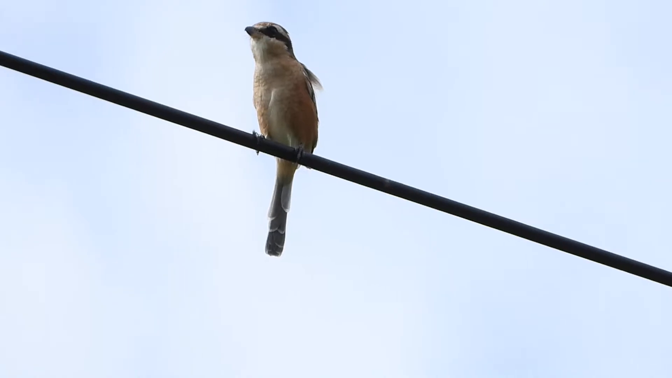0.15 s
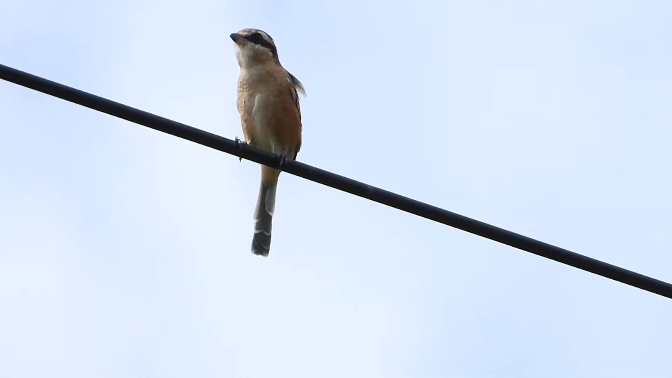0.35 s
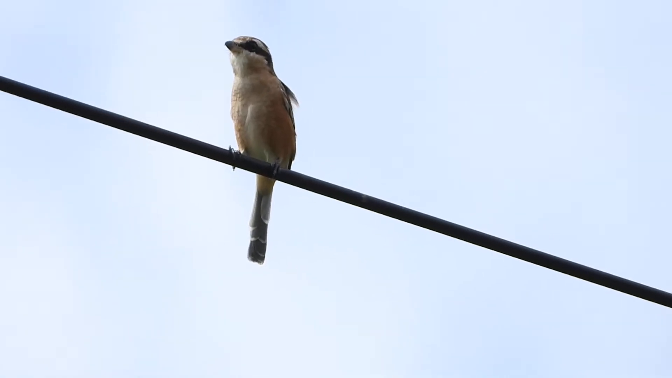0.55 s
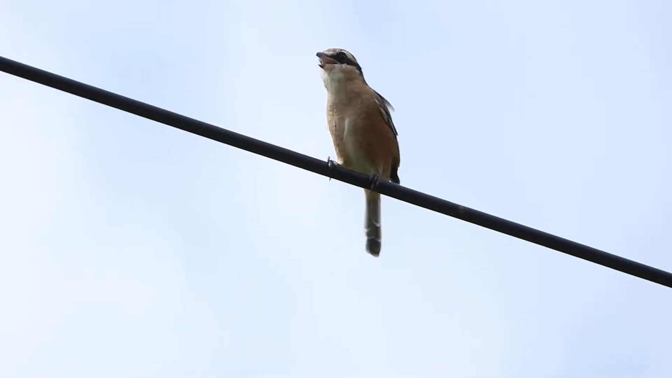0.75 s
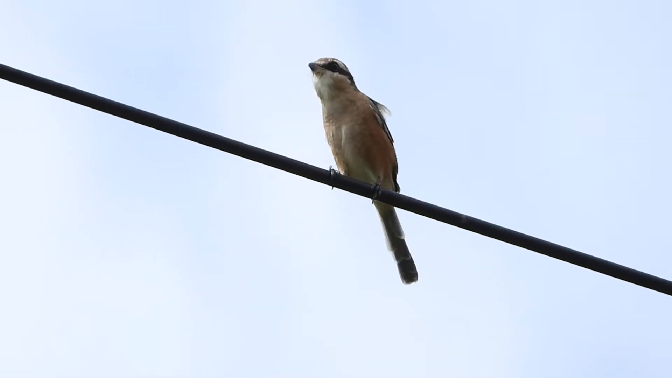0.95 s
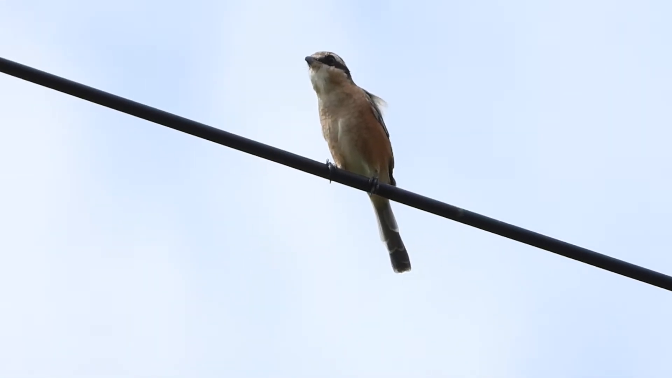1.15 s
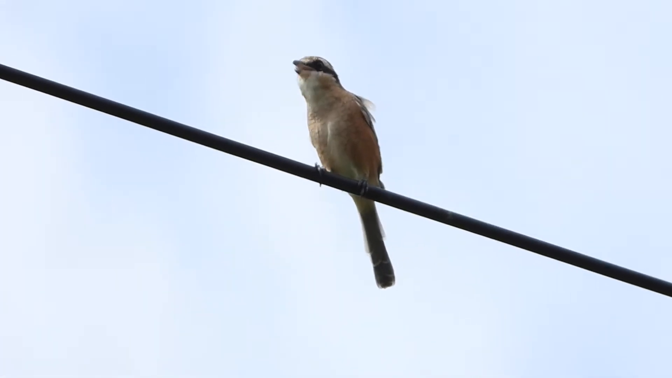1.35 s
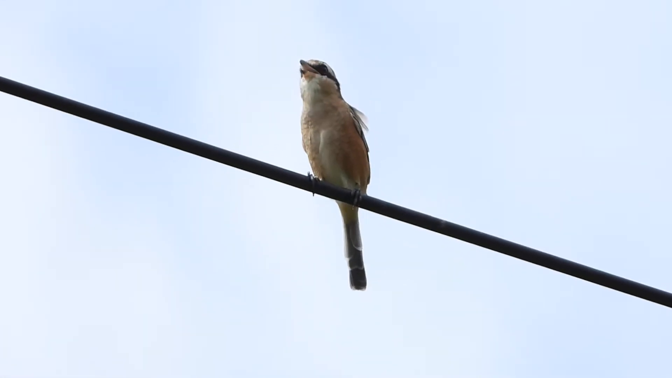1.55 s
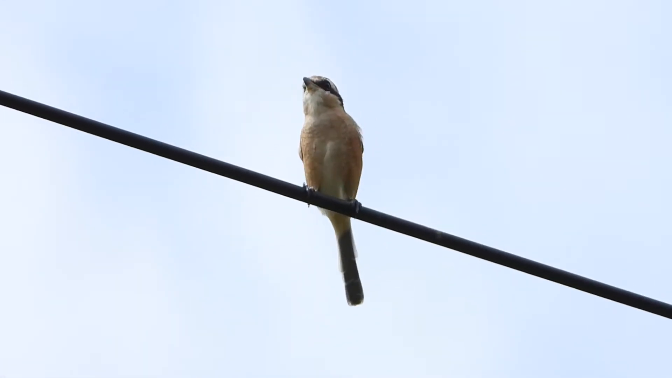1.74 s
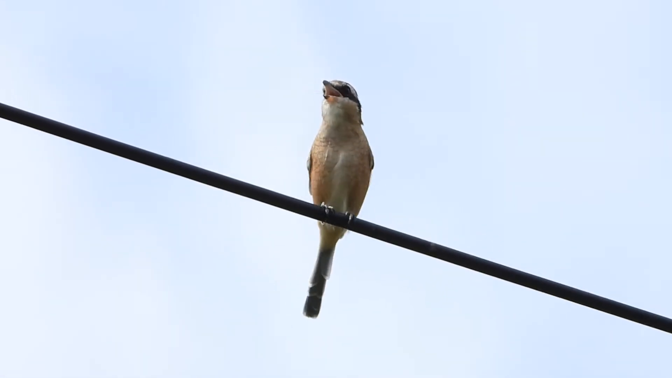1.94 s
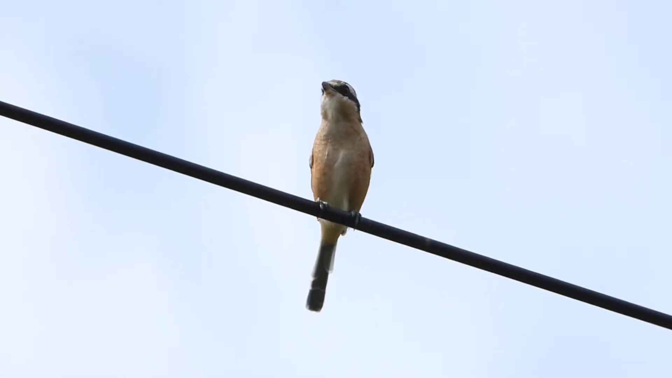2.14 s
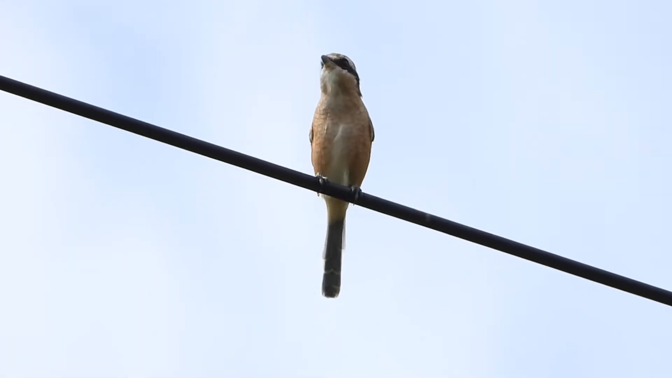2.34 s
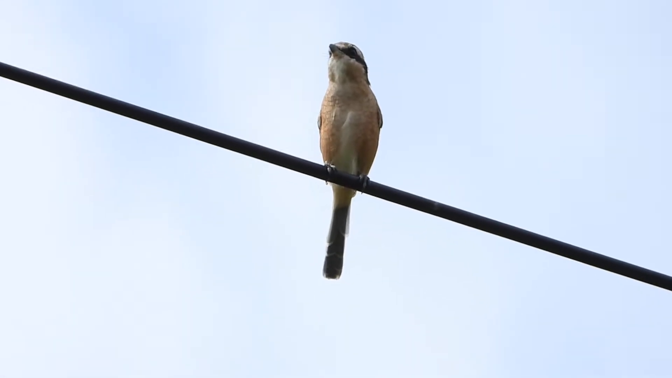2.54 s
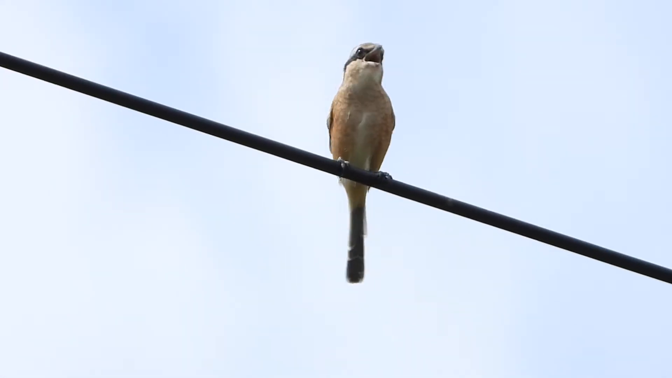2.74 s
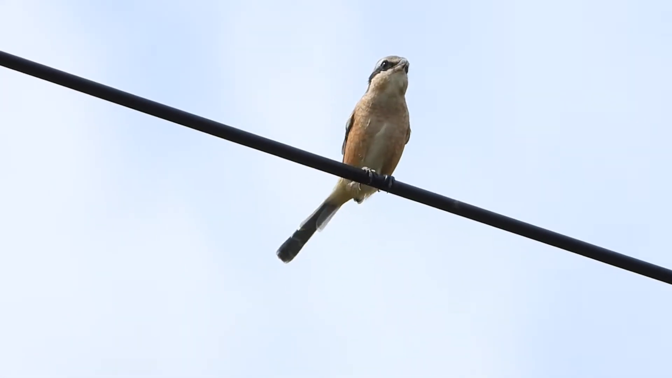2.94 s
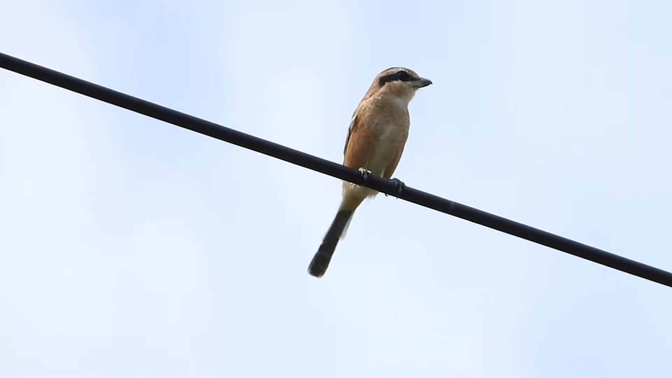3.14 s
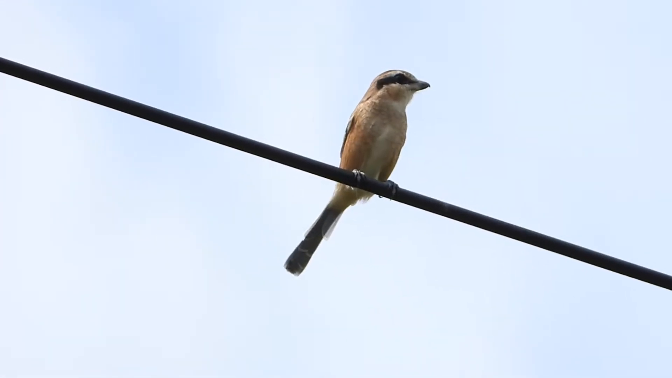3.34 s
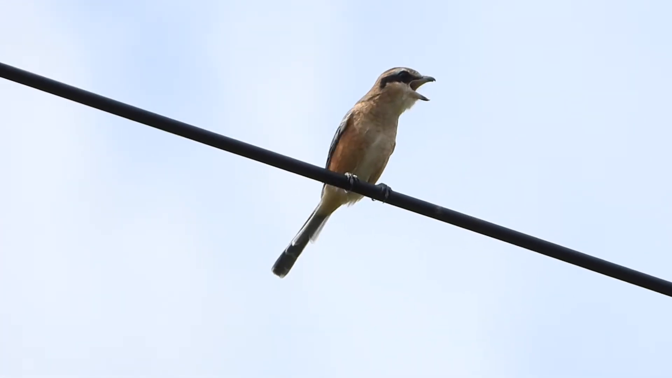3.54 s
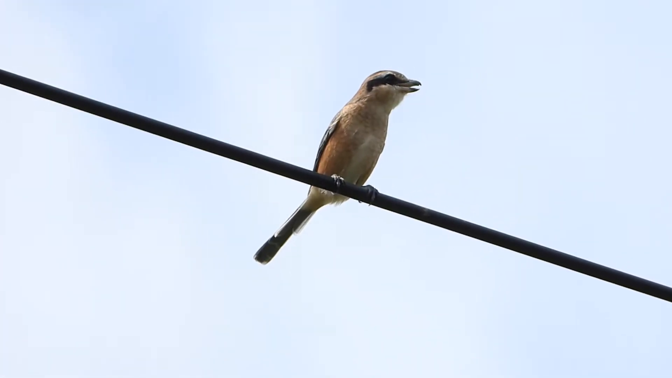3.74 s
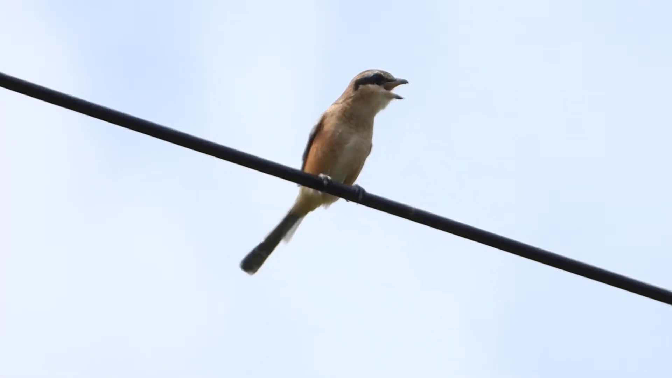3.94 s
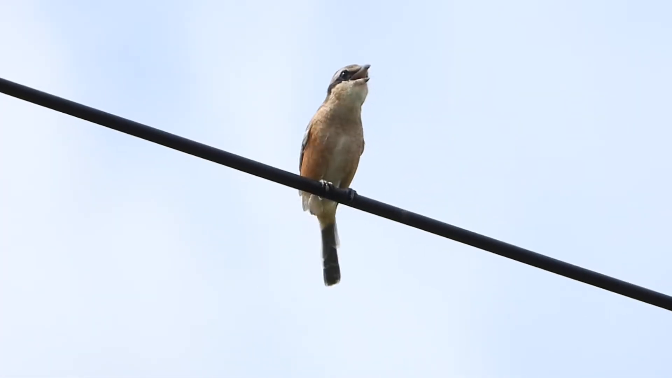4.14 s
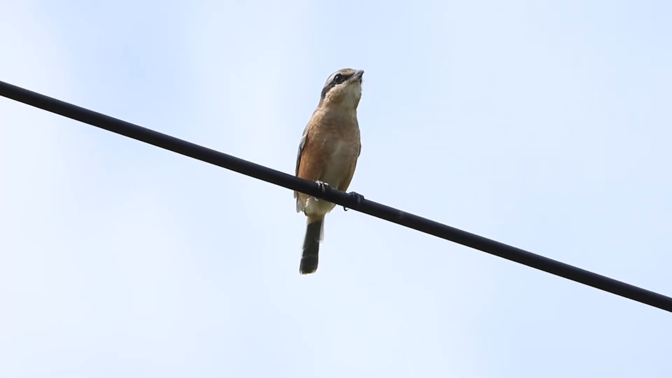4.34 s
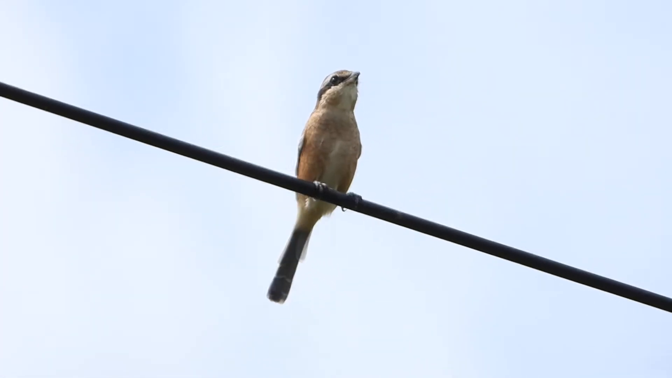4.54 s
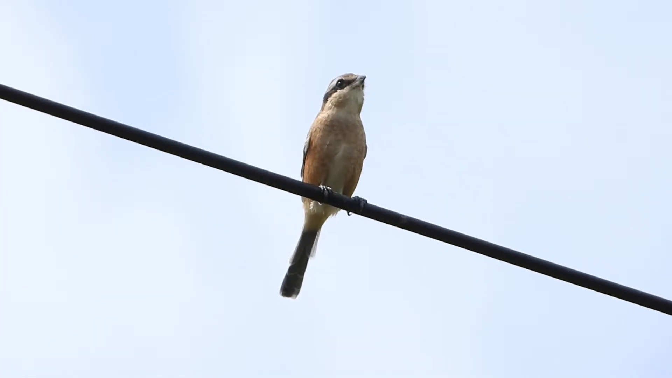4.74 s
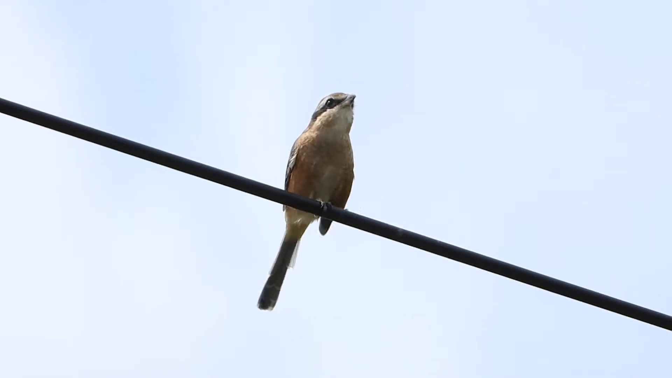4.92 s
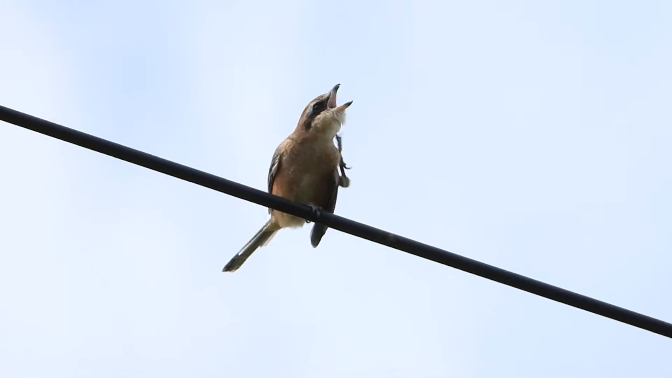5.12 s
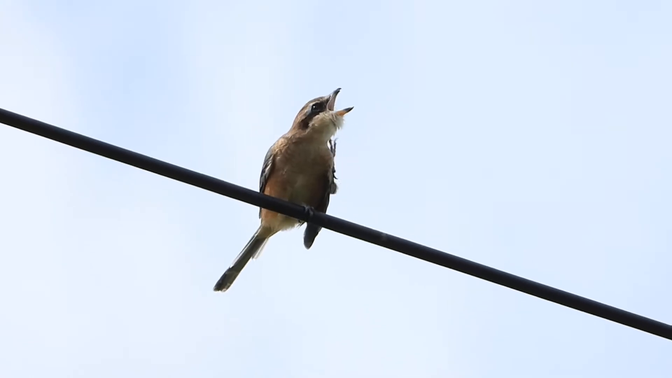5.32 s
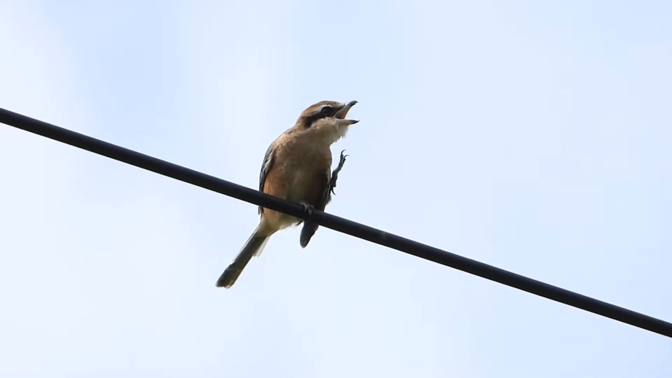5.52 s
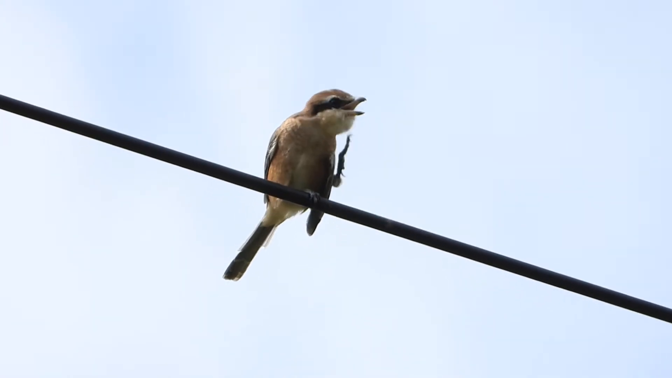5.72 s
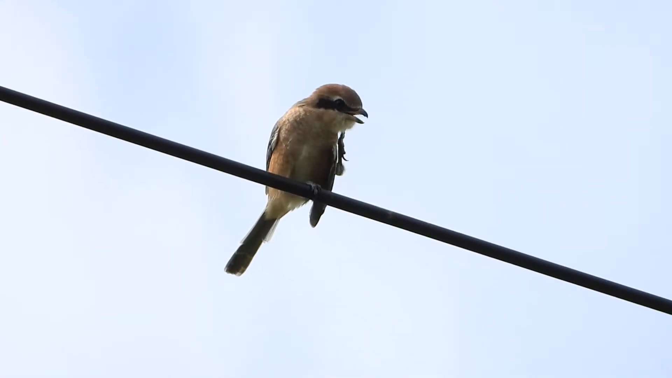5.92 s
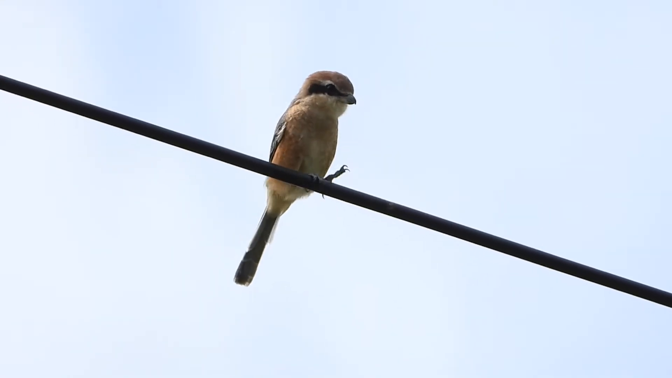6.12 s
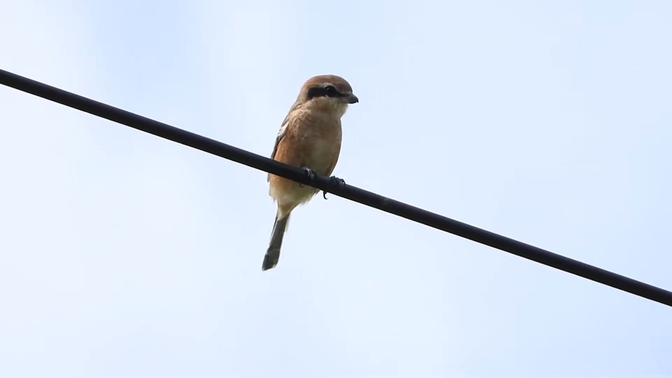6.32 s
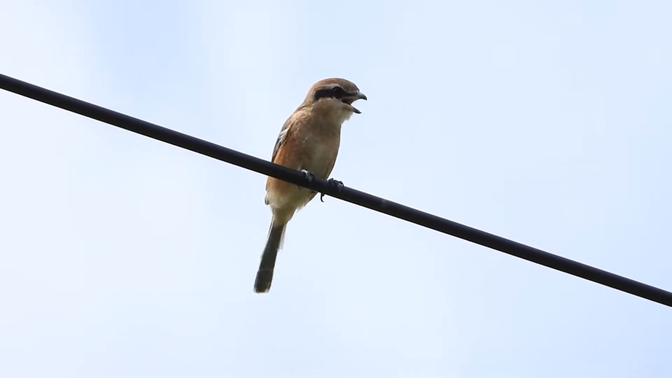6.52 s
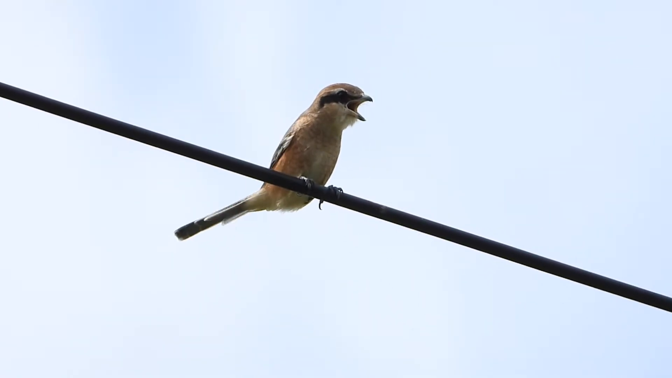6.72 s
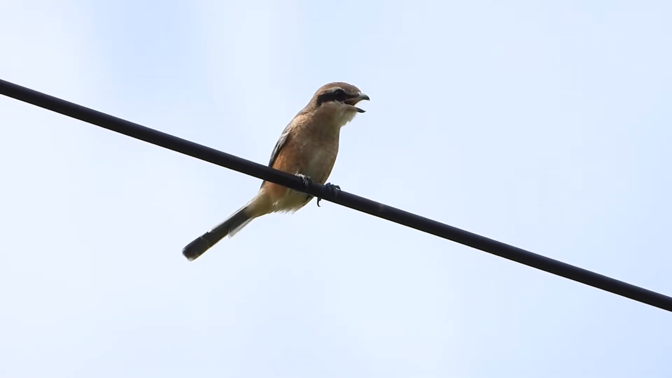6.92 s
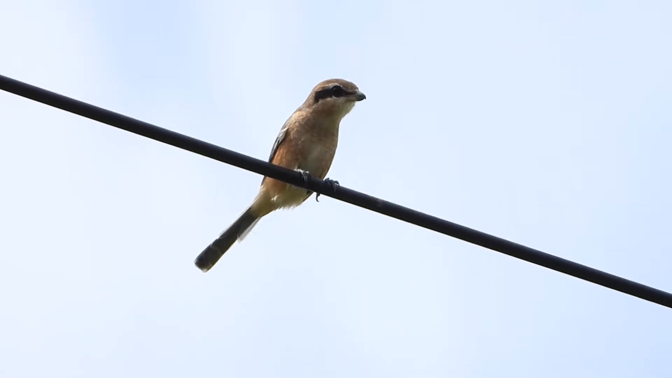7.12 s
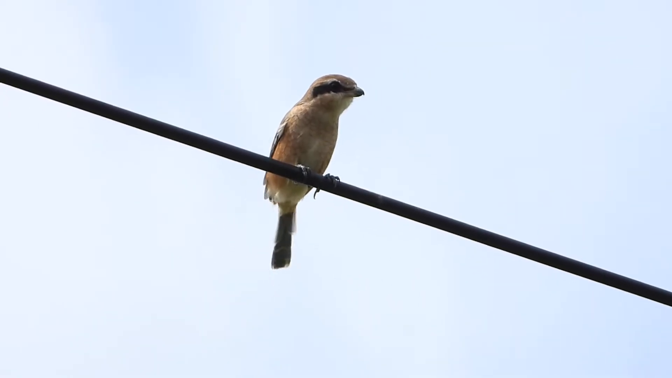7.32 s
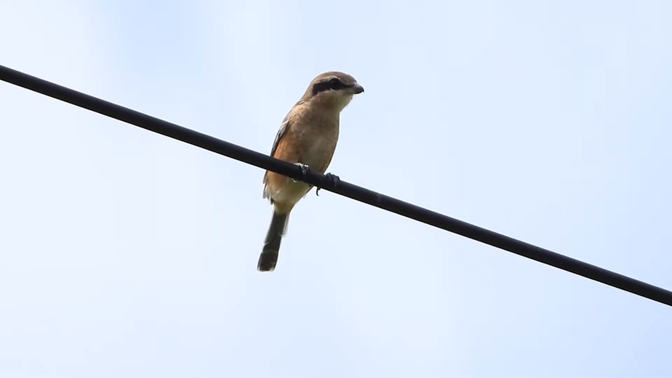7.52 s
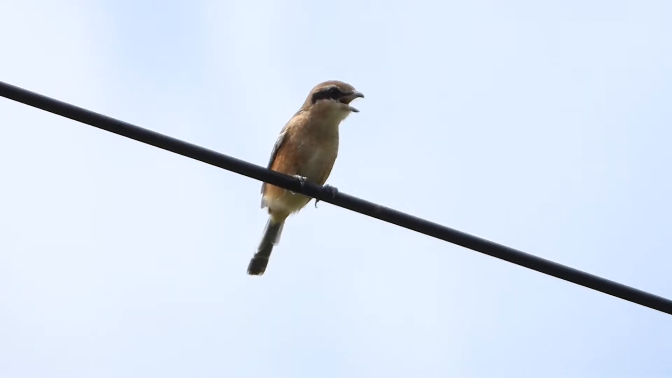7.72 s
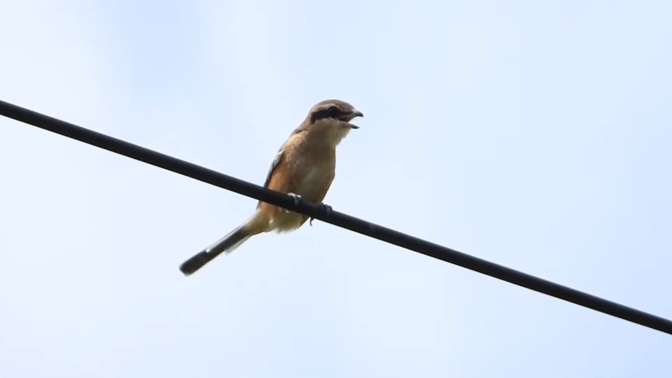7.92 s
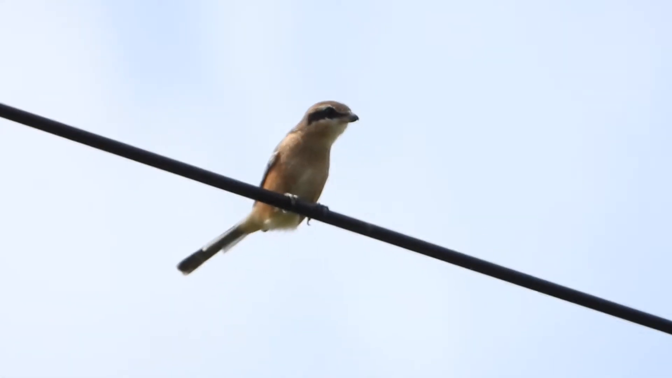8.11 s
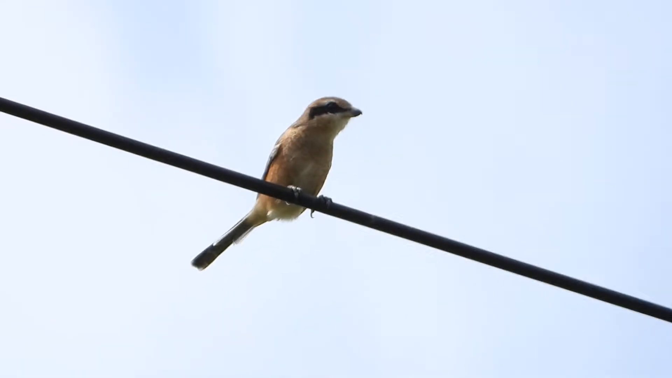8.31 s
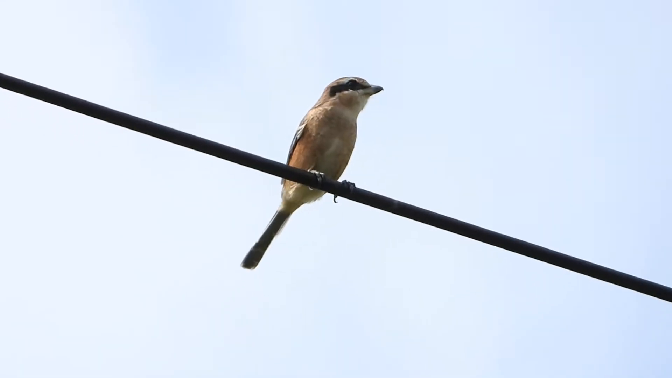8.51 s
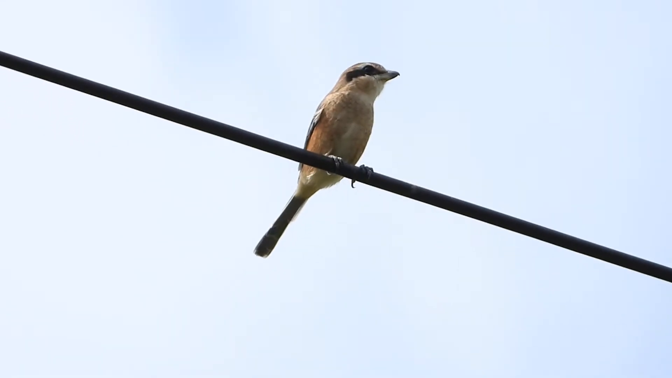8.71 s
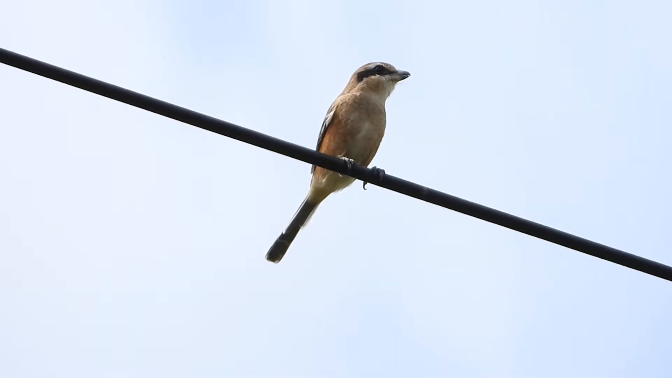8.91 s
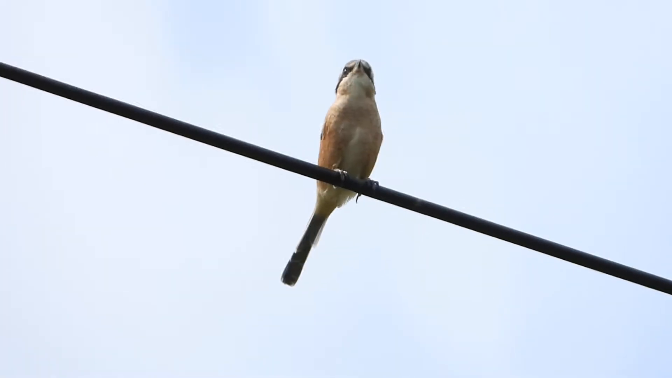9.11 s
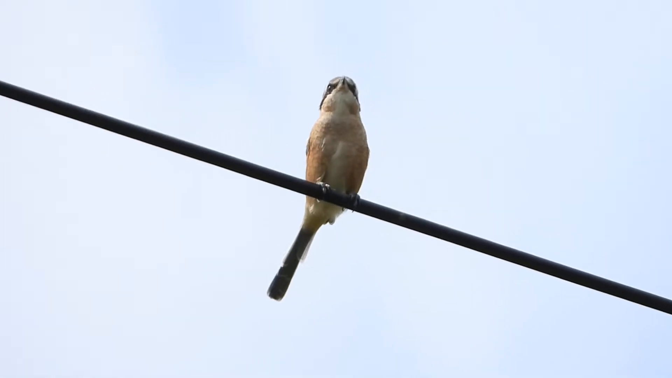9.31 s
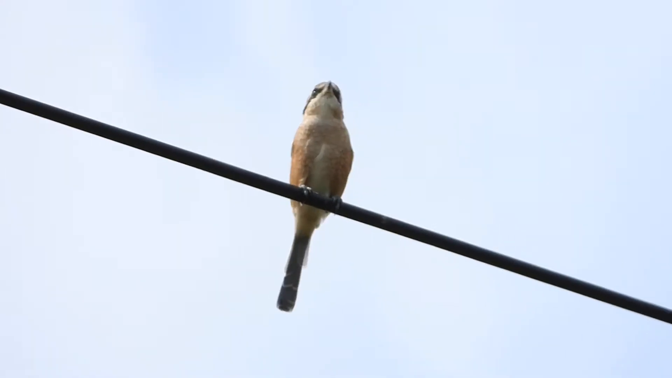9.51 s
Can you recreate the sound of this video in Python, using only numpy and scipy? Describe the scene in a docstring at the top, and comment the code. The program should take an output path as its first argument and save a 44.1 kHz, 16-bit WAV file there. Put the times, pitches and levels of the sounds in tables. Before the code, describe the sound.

A perched shrike gives sharp chirps, some short and clipped, others longer, raspy and falling, over distant cicada hiss and soft town hum.

```python
"""Near a town with walls and trees, a shrike on a wire calls in short and longer falling notes, metres from a
camera. Each note is a stack of four gliding partials with a rush of air; random reflections echo it. Behind it,
shaped noise makes a far cicada chorus, town hum, thin hiss, a brief low roughness as the engine revs, and gusts
of wind. An engine drones as a stack of partials; early on a distant bird hoots three arching notes and one dry
tick sounds."""
import sys
import numpy as np
from scipy import signal
from scipy.fft import rfft, irfft, next_fast_len
from scipy.io import wavfile
from scipy.ndimage import uniform_filter1d

SR = 44100
rng = np.random.default_rng(int(sys.argv[2]) if len(sys.argv) > 2 else 0)


def wav_record(signal):
    """Record a signal, one row per channel, as 16-bit PCM in the file named by sys.argv[1]."""
    frames = np.transpose(np.atleast_2d(signal))
    bounded = np.clip(frames, -1, 1)
    # unit amplitude maps onto the largest positive 16-bit level
    quanta = np.round(bounded * 32767).astype(np.int16)
    wavfile.write(sys.argv[1], SR, quanta)


N = 421596  # length in samples


def undb(db):
    """Turn decibels into an amplitude factor."""
    return 10 ** (np.asarray(db) / 20)


def curve(rows):
    """Join (time, value) points by straight lines, giving a value at every sample."""
    return np.interp(np.arange(N) / SR, *np.transpose(rows))


def on_log(rows, hz):
    """Read a (frequency, value) table, with straight lines on a log frequency scale."""
    f, value = np.transpose(rows)
    return np.interp(np.log(hz), np.log(f), value)


def walk(rate):
    """Random levels held 1 / rate s, then smoothed twice; spread near 1."""
    hold = int(SR / rate)
    steps = np.repeat(rng.standard_normal(N // hold + 1), hold)
    smooth = uniform_filter1d(uniform_filter1d(steps, hold), hold)
    return 1.316 * smooth[:N]


def add(track, s, sound):
    """Mix a sound into a track from time s."""
    i = int(s * SR)
    track[i:i + len(sound)] += sound


# How wide the background noises are: (f/Hz, side minus mid level/dB)
NOISE_WIDTH = [(40, 1), (125, -4), (250, -10), (500, -10.5), (1000, -13), (2000, -7), (4400, -2.5),
               (6500, -6.5), (9000, -2), (15000, -3)]
# How far they lean to one side: (f/Hz, left minus right level/dB)
NOISE_LEAN = [(60, -3), (110, -1.5), (200, 0.5), (380, 0), (700, 0.0), (1290, -1.5), (2380, -0.5),
              (4400, 1), (8120, -2.5), (15000, -0.5)]


def noise(colour, swell_db, flicker_db, rate, count=2, steady_hz=np.inf):
    """Stereo noise of rms 1 in overlapping bands (count to the octave) that swell together and flicker alone."""
    size = next_fast_len(N)
    hz = np.arange(1, size // 2 + 2) * SR / size
    low, high = colour[0][0], colour[-1][0]
    shape = undb(on_log(colour, hz)) * (hz > low) * (hz < high)
    mid, side = rfft(rng.standard_normal((2, size))) * shape
    side = side * undb(on_log(NOISE_WIDTH, hz))
    lean = undb(on_log(NOISE_LEAN, hz) / 2)
    pair = np.array([(mid + side) * lean, (mid - side) / lean])
    out = 0
    shared_swell = swell_db * walk(2.497)
    for step in np.arange(0, count * np.log2(high / low) + 1):
        share = np.clip(1 - abs(count * np.log2(hz / low) - step), 0, 1)
        band = irfft(pair * share, size)[:, :N]
        centre_hz = low * 2 ** (step / count)
        depth_db = flicker_db * min(1, steady_hz / centre_hz)  # shallower above steady_hz
        out = out + band * undb(shared_swell + depth_db * walk(rate))
    return out / np.sqrt(np.mean(out.mean(axis=0) ** 2))


# Loudness of the town: (t/s, level/dB)
TOWN_LEVEL = [(0.45, -48), (0.7, -45.5), (2.1, -46), (4.53, -46), (5.6, -46.5), (6.84, -45.5),
              (7.95, -44.5), (8.24, -45.5), (9.56, -45.5)]
# Balance of low and high sound in the town hum: (f/Hz, level/dB)
TOWN_TONE = [(76, -47), (130, -27.5), (185, -8), (249, -11.5), (291, -9), (330, -5.5), (450, -6), (565, -4),
             (718, 0), (1190, -2.5), (2010, -8), (3800, -11.5), (4940, -102), (8360, -120)]
TOWN_FLICKER_DB, TOWN_FLICKER_RATE = 3.2, 16  # depth/dB, changes per s
STEADY_ABOVE_HZ = 1240  # the flicker fades towards the treble


def town():
    """Town hum: broad noise whose many narrow bands flicker, least in the treble."""
    hum = noise(TOWN_TONE, 0.68, TOWN_FLICKER_DB, TOWN_FLICKER_RATE, count=8, steady_hz=STEADY_ABOVE_HZ)
    return hum * undb(curve(TOWN_LEVEL))


# Loudness of the thin hiss: (t/s, level/dB)
HISS_LEVEL = [(0.45, -55), (1.4, -53.5), (3.52, -55), (5.91, -55.5), (6.87, -54.5), (7.78, -56.5),
              (8.77, -56.5), (9.56, -56)]
# Balance within the hiss: (f/Hz, level/dB)
HISS_TONE = [(4410, -30), (7500, -3.5), (9850, -8.5), (11800, -10.5), (14400, -22), (15500, -35)]


def hiss():
    """A thin treble noise that slowly changes level."""
    return noise(HISS_TONE, 1.0, 0.22, rate=20) * undb(curve(HISS_LEVEL))


# Loudness of the cicada chorus: (t/s, level/dB)
CICADA_LEVEL = [(0.45, -45), (0.93, -39.5), (2.38, -41.5), (4.84, -39), (5.32, -40.5), (5.73, -40.5),
                (5.96, -38.5), (7.02, -40), (7.43, -41), (8.11, -42), (9.13, -41.5), (9.28, -39.5),
                (9.56, -40.5)]
# Balance within the chorus: (f/Hz, level/dB per Hz)
CICADA_TONE = [(2120, -16), (3600, -43), (3970, -14), (4700, -2), (5580, 0), (6800, -6), (8500, -19.5),
               (11000, -29.5), (18700, -120)]
CICADA_PULSE_HZ, CICADA_PULSE = 390, 0.18  # average click rate, share of the level that throbs


def cicadas():
    """A far chorus: noise throbbing faintly at the insects' slightly wandering click rate."""
    click_hz = CICADA_PULSE_HZ * (1 + 0.018 * walk(6))
    throb = 1 + CICADA_PULSE * np.sin(2 * np.pi * np.cumsum(click_hz) / SR)
    return noise(CICADA_TONE, 0.72, 0.18, rate=8.1) * throb * undb(curve(CICADA_LEVEL))


# Balance within the low rough sound: (f/Hz, level/dB)
RUMBLE_TONE = [(220, -25), (300, -4), (450, 0.5), (600, -2), (750, -8), (900, -22)]
RUMBLE_S, RUMBLE_RISE_S, RUMBLE_HOLD_S, RUMBLE_FALL_S, RUMBLE_DB = 8.15, 0.11, 0.32, 0.073, -45.5


def rumble():
    """Rough low noise from the engine as it briefly revs: strongly flickering noise that rises, holds and falls
    once."""
    s = RUMBLE_S + np.cumsum([0, RUMBLE_RISE_S, RUMBLE_HOLD_S, RUMBLE_FALL_S])
    shape = curve(list(zip(s, [0, 1, 1, 0])))
    return noise(RUMBLE_TONE, 0, 5.7, rate=18, count=6) * undb(RUMBLE_DB) * shape


# Gusts on the microphone: (t/s, peak level/dB, width/s)
WIND_GUSTS = [(1.74, -77, 1.5), (3.11, -75.5, .4), (3.82, -67, 0.31), (4.96, -72, .35), (5.8, -70, 0.76),
              (7.5, -73, .35), (8.06, -67, 0.41), (8.72, -70.5, 0.28), (9.33, -68.5, 0.37),
              (9.56, -68, 0.24)]
CALM_DB, GUST_SLOPE_DB = -79.5, 13.5  # the lull; how far a gust has dropped one width from its peak


def gusts():
    """Level of the wind in dB: a lull, with a peak at every gust."""
    t = np.arange(N) / SR
    peaks = [db - GUST_SLOPE_DB * abs(t - s) / width for s, db, width in WIND_GUSTS]
    return np.max([CALM_DB + 0 * t] + peaks, axis=0)


# Balance within the wind: (f/Hz, level/dB)
WIND_TONE = [(15, -50), (25, -20), (48, -23), (81, -6), (119, -4.5), (150, 1), (200, -28), (330, -120)]


def wind():
    """Wind on the microphone: deep noise that follows the gusts."""
    return noise(WIND_TONE, 2.2, 3.2, rate=7.1) * undb(gusts())


# A far engine, briefly louder late on:
# (t/s, average firing rate f/Hz, fifth partial level/dB, fundamental level/dB), levels before the waver
ENGINE_DRONE = [(.3, 89.5, -68, -90), (1.2, 100, -64, -82), (2.1, 100, -66, -83), (2.5, 99.6, -66, -90),
                (3.7, 101, -66, -86), (4.3, 97.5, -64, -86), (5, 95, -66, -90), (5.7, 90.3, -66, -90),
                (6.95, 90.3, -65, -90), (7.3, 87.5, -64, -90), (8.1, 87, -61, -90), (8.27, 87, -54, -84),
                (8.57, 86.8, -55, -84), (8.7, 86.7, -67, -90), (9.56, 86, -66, -90)]
# Strength of its higher partials: (multiple of the firing rate, level/dB against the fifth)
ENGINE_STACK = [(2, -10), (3, -5), (4, -6), (5, 0), (6, 2), (7, -4)]


def engine(waver_db=3.5):
    """A thin stack of partials on the firing rate, each swelling on its own as the air stirs."""
    s, hz, db, low_db = np.transpose(ENGINE_DRONE)
    firing_hz = curve(list(zip(s, hz))) * (1 + .006 * walk(6))
    phase = 2 * np.pi * np.cumsum(firing_hz) / SR
    stack = sum(undb(rel_db + waver_db * walk(5)) * np.sin(round(k) * phase) for k, rel_db in ENGINE_STACK)
    upper = stack * undb(curve(list(zip(s, db))))
    fundamental = np.sin(phase) * undb(curve(list(zip(s, low_db))) + waver_db * walk(5))
    return np.sqrt(2) * (upper + fundamental)  # levels are rms


# Dry ticks: (t/s, level/dB before the ring dies away)
DRY_TICKS = [(0.376, -25)]


def ticks():
    """A faint dry tick close to the camera: a ring that dies away almost at once."""
    out = np.zeros(N)
    t = np.arange(0, .004, 1 / SR)
    for s, db in DRY_TICKS:
        click = np.sin(2 * np.pi * 3500 * t) * np.exp(-t / 0.00024)
        add(out, s, undb(db) * (click - click.mean()))
    return out


# Distant hoots: (start t/s, length/s, peak rms level/dB before the waver)
HOOT_NOTES = [(0.21, 0.1, -49), (0.6, 0.073, -39), (0.989, 0.097, -38.5)]
# each rises to a top pitch and sags; times as shares of its length
HOOT_FROM_HZ, HOOT_TOP_HZ, HOOT_TO_HZ, HOOT_RISEN, HOOT_SAGS = 970, 1100, 1000, 0.5, 0.7
HOOT_PEAK, HOOT_FROM_DB, HOOT_TO_DB = .75, -8, -12  # time of the peak; ends against the peak
HOOT_WAVER_DB = 2


def hoots():
    """A distant bird: soft pure tones whose pitch arches upwards and whose level wavers."""
    out = np.zeros(N)
    for s, length, peak_db in HOOT_NOTES:
        u = np.linspace(0, 1, int(length * SR))
        hz = np.interp(u, [0, HOOT_RISEN, HOOT_SAGS, 1], [HOOT_FROM_HZ, HOOT_TOP_HZ, HOOT_TOP_HZ, HOOT_TO_HZ])
        db = peak_db + np.interp(u, [0, HOOT_PEAK, 1], [HOOT_FROM_DB, 0, HOOT_TO_DB])
        tone = np.sqrt(2) * np.sin(2 * np.pi * np.cumsum(hz) / SR)
        add(out, s, tone * undb(db) * signal.windows.tukey(len(u), .3))
    return out * undb(HOOT_WAVER_DB * walk(59.4))


# Faint echoes from close by: (delay t/s, level/dB before scatter and colour)
NEAR_ECHO = [(.002, -37), (.012, -38), (.024, -41)]
# Scattered echoes after a note: (delay t/s, level/dB before scatter and colour)
LATER_ECHO = [(.034, -35.5), (.046, -36.5), (.062, -43.5), (.08, -44), (.1, -53.5), (.2, -62), (.45, -88)]
# What the walls and leaves return best: (f/Hz, level/dB)
ECHO_TONE = [(1500, -8), (2400, -3), (3050, -3), (3450, -8), (4250, 1), (5000, -1.5), (6000, -2.5),
             (7200, -3), (8500, 3), (10500, 4), (12000, -2), (15000, -12)]
ECHO_SCATTER_DB = 3  # random spread of the reflections
ECHO_SHARED = 0.59  # share common to both ports of the microphone
WALL_S, WALL_DB = .034, -26  # one clear echo from the nearest wall, before its colour


def surroundings(x):
    """Walls and trees return many uneven reflections of the call, partly the same at both ports."""
    s, db = np.transpose(NEAR_ECHO + LATER_ECHO)
    t = np.arange(0, s[-1], 1 / SR)
    unevenness = undb(ECHO_SCATTER_DB * rng.standard_normal(len(t)))
    taps = rng.standard_normal((3, len(t))) * unevenness
    taps = np.sqrt(ECHO_SHARED) * taps[0] + np.sqrt(1 - ECHO_SHARED) * taps[1:]
    taps = taps * undb(np.interp(t, s, db) - ECHO_SCATTER_DB)
    taps[:, int(WALL_S * SR)] += undb(WALL_DB)
    hz = np.arange(1, len(t) // 2 + 2) * SR / len(t)
    taps = irfft(rfft(taps * (t > s[0])) * undb(on_log(ECHO_TONE, hz)), len(t))
    return signal.fftconvolve(x[None], taps)[:, :N]


BODY_S, BODY_DB = .004, -11.5  # decay time of the scatter; its level against the call


def body(x):
    """Scatter off the camera and its mount, added with opposite sign to the two channels."""
    t = np.arange(0, 4 * BODY_S, 1 / SR)
    taps = rng.standard_normal(len(t)) * np.exp(-t / BODY_S)
    side = np.convolve(x, taps)[:N]
    match = np.sqrt(np.sum(x ** 2) / np.sum(side ** 2))  # as strong as the call
    return side * undb(BODY_DB) * match * np.array([[1], [-1]])


ATTACK_DB = -15  # every note swells up from this far below its level


def swell(t, attack):
    """Level in dB of a note's quick onset."""
    return ATTACK_DB * np.clip(1 - (t - t[0]) / attack, 0, 1) ** 2


# Short notes: (start t/s, opening pitch f/Hz, held/s, slide to the knee/s, second partial peak level/dB)
SHORT_CALLS = [(2.059, 3100, .005, .0085, -12.5), (3.637, 3110, .0055, .009, -10.5),
               (3.719, 3090, .0075, .005, -12.5), (4.132, 3120, .006, .0055, -11.5),
               (4.231, 3060, .006, .0065, -10.5), (6.684, 2740, .007, .0025, -16.5),
               (6.764, 2960, .0065, .0055, -12.5), (6.853, 3050, .007, .0045, -12.5),
               (6.98, 2750, .0075, .0045, -14), (7.899, 3010, .007, .0065, -13.5),
               (7.983, 3050, .004, .01, -12.5)]
# Level as the pitch passes the throat resonance: (pitch f/Hz, level/dB against the peak)
SHORT_RESONANCE = [(1280, -44), (1450, -35), (1600, -24), (1770, -17), (2430, -1.5), (2600, 0),
                   (2750, -2.5), (2900, -6), (3080, -7.5)]
SHORT_ATTACK_S, SHORT_FLUTTER = .002, .2  # attack time, share of the flutter
STEP_S, STEP_TO_HZ = .002, 2730  # the slide opens with a quick step in pitch
# then the pitch plunges from the knee and trails off
KNEE_HZ, PLUNGE_S, PLUNGE_TO_HZ, TRAIL_S, TRAIL_TO_HZ = 2484, 0.00529, 1761, 0.012, 1286


def short_note(start, top_hz, held, slide, peak_db):
    """Hold, step, slide to the knee, plunge, trail off; loudest where the pitch meets the throat."""
    s = start + np.cumsum([0, held, STEP_S, slide - STEP_S, PLUNGE_S, TRAIL_S])
    t = np.arange(start, s[-1], 1 / SR)
    hz = np.interp(t, s, [top_hz, top_hz, STEP_TO_HZ, KNEE_HZ, PLUNGE_TO_HZ, TRAIL_TO_HZ])
    db = peak_db + on_log(SHORT_RESONANCE, hz) + swell(t, SHORT_ATTACK_S)
    return t, hz, db, SHORT_FLUTTER


# Long notes: (start t/s, attack/s, opening pitch f/Hz, held/s, slide/s, pitch f/Hz at the slide's end,
# slide time constant/s, level/dB at start, level/dB at the slide's end, flutter share);
# both levels come before the throat's effect
LONG_CALLS = [(.95, .003, 2560, .0005, .045, 1640, .0095, -17.5, -21, .6),
              (1.562, .008, 2740, .006, .042, 1770, .034, -15, -20, 1.15),
              (2.927, .005, 2800, .005, .042, 1740, .085, -17.5, -20, 1),
              (9.11, .004, 2800, .0005, .042, 1670, .013, -16, -19.5, .9)]
# Throat resonance in long notes: (pitch f/Hz, level/dB)
LONG_RESONANCE = [(1630, -4), (1800, 0), (1900, -1.5), (2050, -4.5), (2250, -3), (2550, 0), (2850, -2)]
DROOP_S, DROOP_HZ, DROOP_DB = .007, 220, -16  # closing droop: time, fall in pitch, change in level
FLUTTER_FROM_S = 0.0144  # the level flutter sets in this long after the start


def long_note(start, attack, top_hz, held, slide, end_hz, tau, from_db, to_db, flutter):
    """Hold, an ever slower slide, then a droop in pitch and level; the flutter grows late."""
    t = np.arange(start, start + held + slide + DROOP_S, 1 / SR)
    slid = np.clip(t - start - held, 0, slide)
    hz = top_hz + (end_hz - top_hz) * np.expm1(-slid / tau) / np.expm1(-slide / tau)
    droop = np.clip((t - start - held - slide) / DROOP_S, 0, 1)
    db = from_db + (to_db - from_db) * slid / slide + on_log(LONG_RESONANCE, hz) + DROOP_DB * droop
    grown = flutter * np.clip((t - start - FLUTTER_FROM_S) / 0.0041, 0, 1)
    return t, hz - DROOP_HZ * droop, db + swell(t, attack), grown


# Partials 1, 3 and 4 against the second, before the waver, as the pitch falls past the throat resonance:
# (pitch f/Hz, first level/dB, third level/dB, fourth level/dB)
SHORT_STACK = [(1300, 6, 4, -10), (1500, -4, 9, -10), (1900, -16, 5, -14), (2300, -28, -10, -24),
               (2600, -26, -22, -32), (2850, -22, -29, -42), (3050, -15, -33, -50)]
# The same columns for long notes
LONG_STACK = [(1500, -18, -11, -26), (1900, -19, -11, -24), (2300, -19, -13, -23), (2600, -23, -19, -33),
              (2850, -19, -30, -44)]
# How fast these partials waver: (partial, changes per s)
PARTIAL_WAVER = [(1, 300), (3, 350), (4, 350)]
PARTIAL_WAVER_DB = 3.5
# thin steep chirp opening a short note: pitches, length, level against the note's peak
LEAD_FROM_HZ, LEAD_TO_HZ, LEAD_S, LEAD_DB = 7800, 4900, .006, -17.5
FLUTTER_HZ = 235.3  # average rate; it wanders
# shares: pitch and level swing of a full flutter, random pitch jitter, random level rasp
FLUTTER_PITCH, FLUTTER_DEPTH, PITCH_JITTER, HOARSE = .045, .38, .016, .17
EARLY_WOBBLE = .5  # share of the pitch flutter that long notes have from the start
AIR_DB, AIR_LOW_HZ, AIR_HIGH_HZ = -24, 1500, 11000  # air rushing through the beak
AIR_RELEASE_S = .011  # the rush dies away after the tone


def shrike():
    """Four partials on a falling pitch; long notes flutter most, short ones open with a thin steep chirp."""
    out, effort = np.zeros((2, N))
    waver = {k: PARTIAL_WAVER_DB * walk(rate) for k, rate in PARTIAL_WAVER}
    jitter, rasp, pace = walk(600), walk(2500), walk(150)
    air_band = signal.butter(6, (AIR_LOW_HZ, AIR_HIGH_HZ), "band", fs=SR, output="sos")
    air = signal.sosfilt(air_band, rng.standard_normal(N))
    notes = [(False, short_note(*row)) for row in SHORT_CALLS]
    notes += [(True, long_note(*row)) for row in LONG_CALLS]
    for is_long, (t, hz, db, grown) in notes:
        at = (t * SR).astype(int)
        glide = uniform_filter1d(hz, size=40, mode="nearest")  # round the corners
        beat = 2 * np.pi * np.cumsum(FLUTTER_HZ * (1 + 0.14 * pace[at])) / SR
        wobble = FLUTTER_PITCH * np.maximum(grown, EARLY_WOBBLE * is_long) * np.sin(beat)
        phase = 2 * np.pi * np.cumsum(glide * (1 + wobble + PITCH_JITTER * jitter[at])) / SR
        pitch, *partials = np.transpose(LONG_STACK if is_long else SHORT_STACK)
        tone = np.sin(2 * phase)
        for k, rel_db in zip((1, 3, 4), partials):
            tone += undb(np.interp(glide, pitch, rel_db) + waver[k][at]) * np.sin(k * phase)
        edges = np.clip(np.minimum(t - t[0], t[-1] - t) / 0.00012, 0, 1)  # avoid clicks
        puffs = 1 + FLUTTER_DEPTH * grown * np.sin(beat + 2.0) + HOARSE * rasp[at]
        strength = edges * undb(db)
        add(out, t[0], tone * puffs * strength)
        add(effort, t[0], strength)
        if not is_long:
            lead_hz = np.linspace(LEAD_FROM_HZ, LEAD_TO_HZ, int(LEAD_S * SR))
            lead = np.sin(2 * np.pi * np.cumsum(lead_hz) / SR) * np.hanning(len(lead_hz))
            add(out, t[0] - 0.74 * LEAD_S, lead * undb(db.max() + LEAD_DB))
    keep = np.exp(-1 / (AIR_RELEASE_S * SR))
    lingering = signal.lfilter([1 - keep], [1, -keep], effort)
    return out + undb(AIR_DB) * air * np.maximum(effort, lingering)


BIRD_PAN_DB = -.4  # left minus right


def scene():
    """Mix the background, the small sounds and the shrike with its echoes."""
    background = town() + hiss() + cicadas() + rumble() + wind() + engine()
    bird = shrike()
    direct = bird * undb(np.array([[BIRD_PAN_DB], [-BIRD_PAN_DB]]) / 2)
    return background + ticks() + hoots() + surroundings(bird) + body(bird) + direct


START_S, FADE_S, TOP_HZ = 0.13, 0.035, 15600  # opening silence, fade-in, upper limit


def record(dry):
    """The sound fades in after a short silence; a steep low-pass filter cuts the top."""
    fade = np.clip((np.arange(N) / SR - START_S) / FADE_S, 0, 1) ** 2
    return signal.sosfilt(signal.ellip(10, .2, 60, TOP_HZ, fs=SR, output="sos"), dry * fade)


dry = scene()
out = record(dry)
wav_record(out)
```